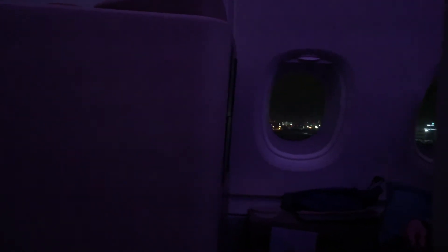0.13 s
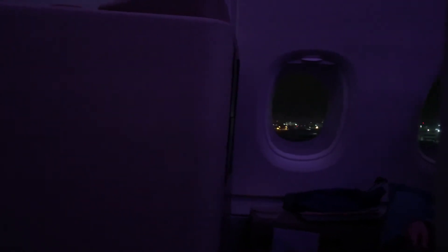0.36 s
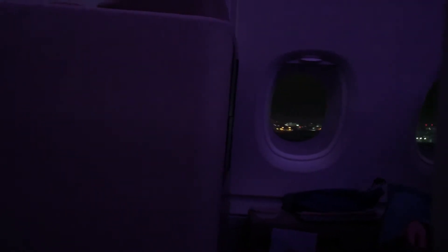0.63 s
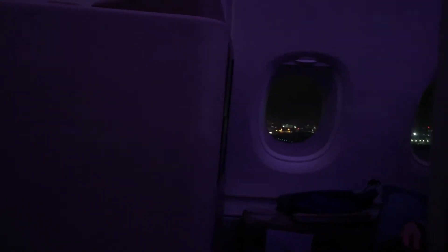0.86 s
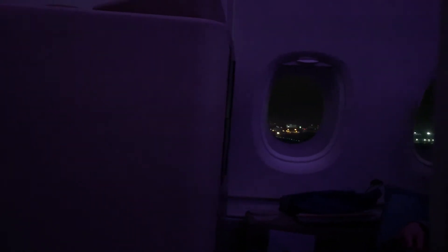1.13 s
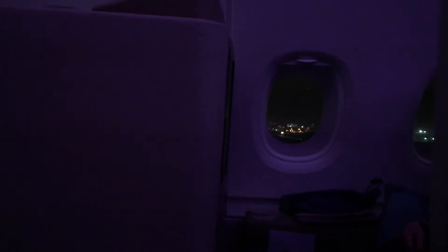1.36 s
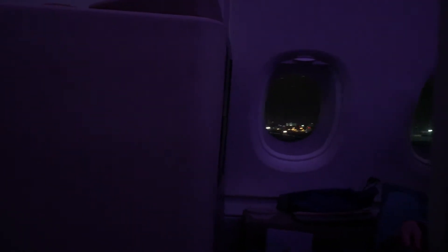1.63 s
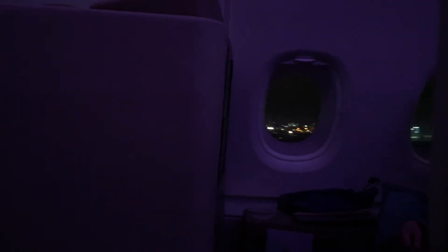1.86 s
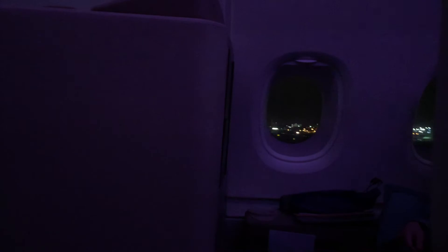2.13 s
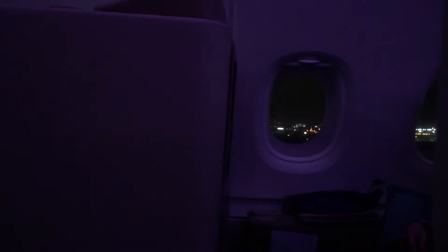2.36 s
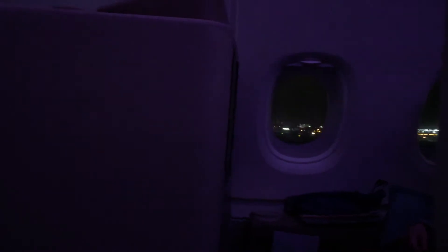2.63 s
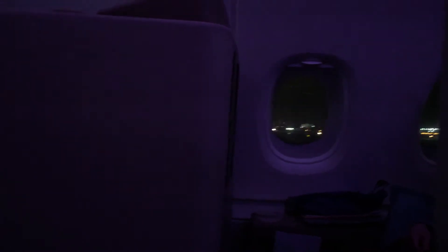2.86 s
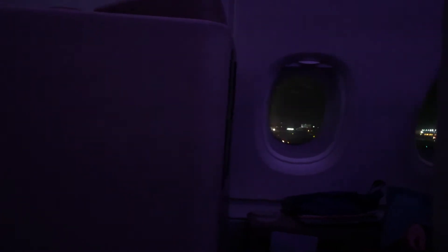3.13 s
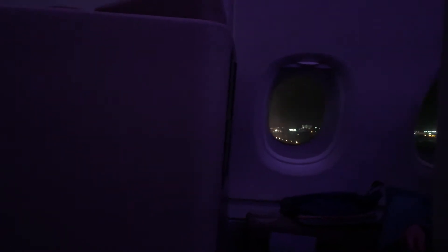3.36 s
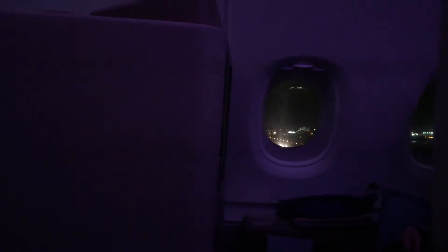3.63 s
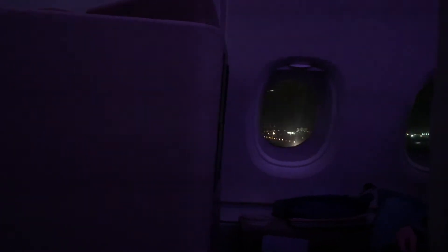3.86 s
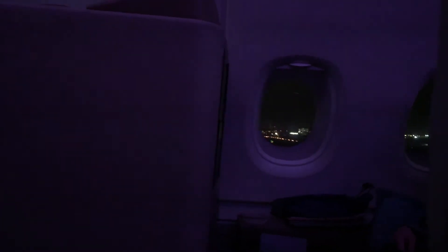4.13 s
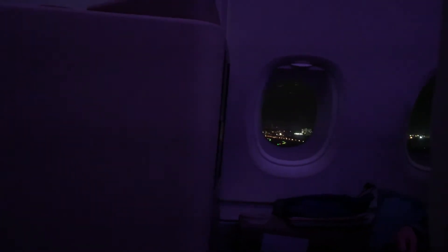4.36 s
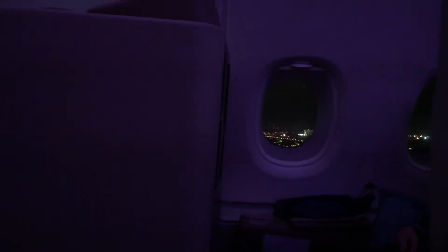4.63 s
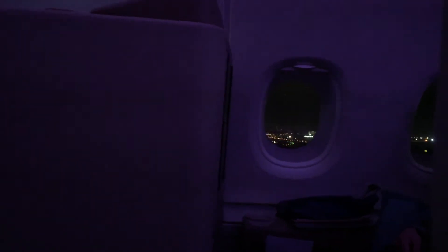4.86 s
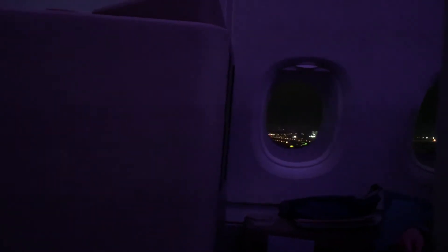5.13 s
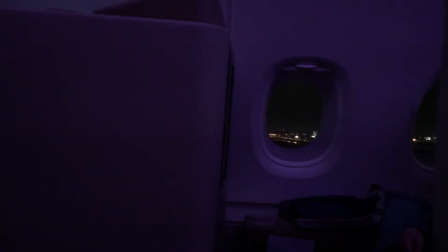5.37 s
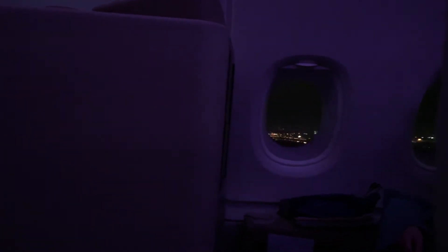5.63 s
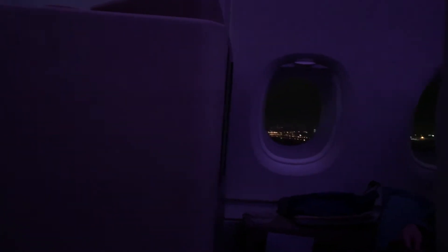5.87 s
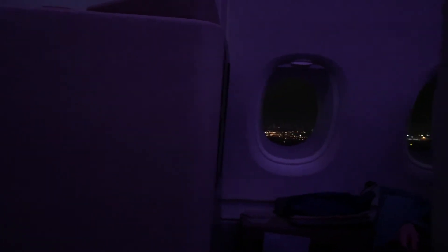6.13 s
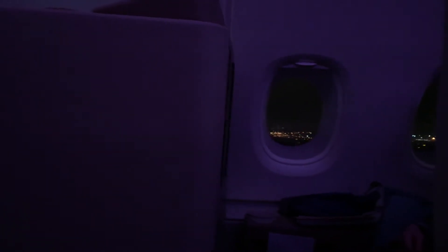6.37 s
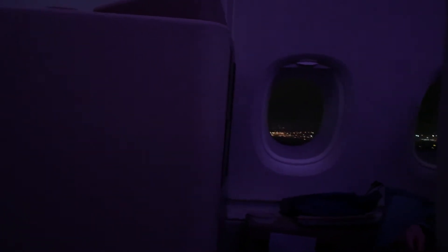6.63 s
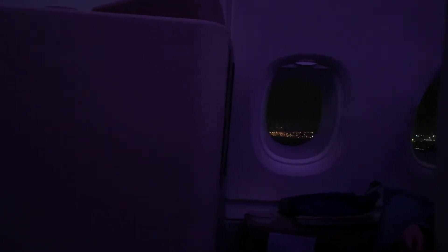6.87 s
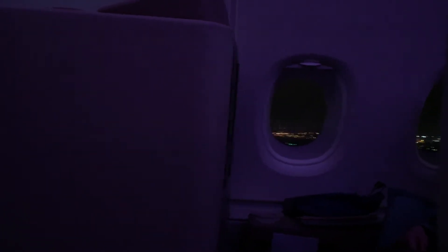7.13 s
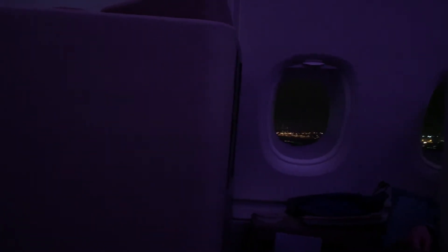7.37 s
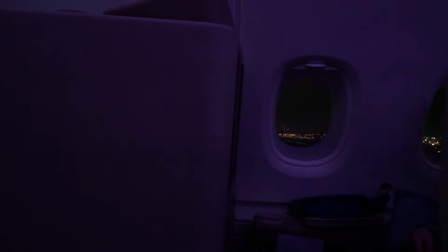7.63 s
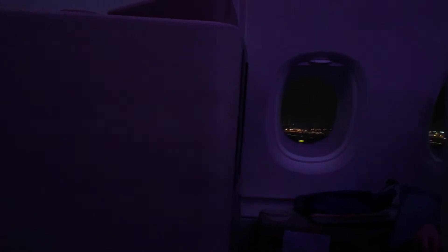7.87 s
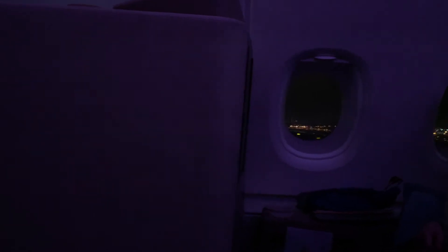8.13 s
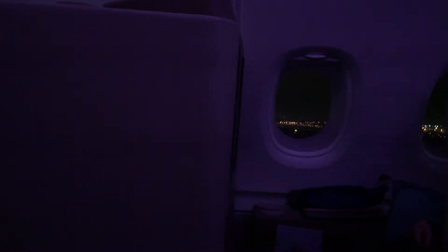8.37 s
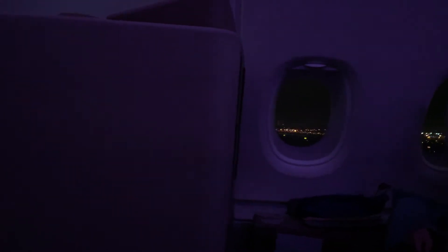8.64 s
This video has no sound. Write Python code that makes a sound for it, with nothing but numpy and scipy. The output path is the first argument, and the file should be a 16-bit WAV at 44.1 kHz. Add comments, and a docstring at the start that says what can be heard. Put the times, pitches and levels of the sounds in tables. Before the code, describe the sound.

Inside a passenger plane speeding along the runway, a heavy low roar and soft air hiss, with clattering panels and small sharp clicks.

```python
"""Engine and airframe roar inside an airliner cabin at takeoff: noise shaped by the hull into a deep rumble.
Air rush lies over it as a nearly steady hiss of shaped noise.
Jolts swell the clatter of loose panels, trim and small parts, made of noise bursts and short rings.
Panels knock, a latch ticks and one metal part pings as fading sine tones; plastic trim snaps as sharp cracks.
The cabin adds a short tail to these fittings, and the recorder's gain control evens out the rumble."""
import sys
import numpy as np
from scipy import signal
from scipy.fft import rfft, irfft, next_fast_len
from scipy.io import wavfile
from scipy.ndimage import uniform_filter1d, map_coordinates

SR = 44100
rng = np.random.default_rng(int(sys.argv[2]) if len(sys.argv) > 2 else 0)


def put_to_file(sound):
    """Save the sound as 16-bit audio at rate SR, in the file named by the first command-line argument."""
    columns = np.atleast_2d(sound).T  # one column per channel
    safe = np.clip(columns, -1, 1)
    whole_steps = np.round(safe * 32767)
    wavfile.write(sys.argv[1], SR, whole_steps.astype(np.int16))


def nominal_scale(level):
    """Amplitude ratio for a level in decibels (scalar or array-like)."""
    x = np.asarray(level, float) / 20
    return 10 ** x


N = 385875  # length in samples: 8.75 s

# All levels below are settings ahead of the recorder's gain control.
# Engine roar through the hull: (deep part [dB], body part [dB])
ROAR_LEVELS = (-25, -29.5)
# Hull colour of the deep roar: (frequency [Hz], level per Hz [dB])
DEEP_COLOUR = [(12, -46.5), (22, -22.5), (32, -11), (50, 1), (66, 1), (88, 1.5), (103, -8), (130, -16.5),
               (170, -35.5), (290, -120)]
# Hull colour of the body of the roar: (frequency [Hz], level per Hz [dB])
BODY_COLOUR = [(53, -26.5), (90, -6), (120, -8.5), (150, -6), (178, -8.5), (212, -10.5), (260, -19.5),
               (300, -18), (330, -23.5), (372, -23), (420, -28), (450, -38.5), (520, -40), (680, -55.5),
               (1140, -120)]
# Chance level drift of the deep rumble noise: (time [s], level change [dB])
RUMBLE_DRIFT = [(0, -1), (.35, -2), (.7, 0.5), (1.2, 1.5), (1.9, 0), (2.6, 2.5), (3.2, 0.5), (3.7, -1),
                (4.3, 3), (4.8, 0.5), (5.3, -1), (6, 0.5), (6.7, -2), (7.2, 1), (7.8, 1), (8.1, -3.5),
                (8.75, 0.5)]
# A side wall panel that hums along: (frequency [Hz], width at half amplitude [Hz], rms level [dB])
WALL_HUM = (278, 13, -45.5)
# The humming panel comes and goes: (time [s], level change [dB])
WALL_HUM_SWELL = [(0, 1.5), (1.1, -1.5), (1.6, 2), (2.9, 4), (3.3, -6), (4.3, 2), (5.3, 2), (5.8, -0.5),
                  (7, 0.5), (7.6, 1.5), (8.2, 2), (8.75, -5)]
# Air rush along the skin: (frequency [Hz], level per Hz [dB])
RUSH_COLOUR = [(260, -34), (450, 1.5), (734, 0.5), (1000, -5.5), (1130, -6), (1590, -7), (1870, -11.5),
               (2370, -14.5), (2670, -23.5), (4040, -26), (4820, -33), (5270, -33.5), (7640, -40),
               (8990, -43.5), (15600, -47.5)]
# Colour of the clatter of loose panels: (frequency [Hz], level per Hz [dB])
PANEL_COLOUR = [(260, -34), (450, 2), (684, -0.5), (819, 0.5), (927, -2.5), (1250, -1.5), (1360, -5.5),
                (1570, -4), (1940, -8.5), (3200, -15.5), (4160, -50), (7040, -120)]
# Colour of the clatter of loose trim: (frequency [Hz], level per Hz [dB])
TRIM_COLOUR = [(1350, -19.5), (2300, 0.5), (2470, -3), (3170, -5.5), (3600, -6.5), (4260, -9),
               (4840, -16.5), (5200, -14), (6800, -18), (8840, -49), (15000, -120)]
# Colour of the fizz of small parts: (frequency [Hz], level per Hz [dB])
FIZZ_COLOUR = [(3530, -29.5), (6000, -5.5), (6740, -7), (7180, -11), (8660, -2), (10200, -7.5), (12400, -7),
               (15600, -13)]
# Jolts of the airframe; small parts get the hardness on top:
# (time of peak [s], peak over the steady tremor [dB], length [s], hardness [dB])
AIRFRAME_JOLTS = [(0.01, 18, 0.018, 0.5), (0.122, 4.5, 0.07, 3), (0.437, 5, 0.1, 0.5), (0.637, 6, 0.07, 4),
                  (.82, 5, 0.058, -9), (0.886, 9.5, 0.12, 1.5), (1.142, 5, .06, 3.5),
                  (1.562, 6.5, 0.35, -2.5), (2.16, 5, .25, 1), (2.362, 12.5, 0.036, -7),
                  (2.663, 8, 0.087, 2), (3.068, 3, 0.12, 1.5), (3.601, 3, 0.038, 3.5),
                  (3.897, 6.5, 0.025, 5.5), (3.975, 5.5, 0.03, 7.5), (4.041, 0.5, 0.027, 9),
                  (4.3, 0.5, 0.086, 5), (4.832, 7, 0.094, -1), (4.926, 7, 0.088, 1), (5.07, 5, 0.054, -8.5),
                  (5.17, 5, 0.2, 2.5), (5.456, 13, 0.048, 3), (5.545, 11, 0.086, -3),
                  (5.644, 4.5, 0.048, -1), (5.803, 9, 0.062, -2.5), (5.894, 14, 0.069, 5),
                  (6.383, 5.5, 0.35, 0), (6.757, 8, 0.058, 1), (7.13, 12.5, 0.057, 2.5), (7.21, 4, .06, 7),
                  (7.44, 8, 0.16, -1), (7.87, 5.5, 0.15, 1), (8.518, 6, 0.11, 3.5), (8.722, 11, 0.12, -0.5)]
# Clatter settings under the steady tremor alone: (panels [dB], trim [dB], small parts [dB])
TREMOR_LEVELS = (-55, -68, -81.5)
# Clatter gained per dB of jolt: (panels [dB/dB], trim [dB/dB], small parts [dB/dB])
JOLT_GROWTH = (0.92, 1.227, 0.94)
# Single knocks of a panel; struck nearer the edge it rings brighter:
# (time [s], peak level [dB], tilt [dB per octave])
PANEL_KNOCKS = [(0.018, -33, -5), (0.122, -32.5, 1), (0.67, -38, 2), (0.818, -34.5, -6.5), (0.907, -37, 8),
                (0.963, -37, -5), (1.114, -36.5, 1), (1.173, -37, 4), (2.141, -34, 0), (2.237, -33.5, -3),
                (2.68, -36, 0), (2.934, -33.5, -3), (3.919, -36.5, 5), (4.01, -38.5, 4), (4.338, -45, 3),
                (4.8, -33.5, 6), (4.94, -39, 8), (4.956, -31.5, -7), (5.15, -36.5, -6), (5.17, -39, 6),
                (5.379, -37, 4), (5.428, -34.5, 1), (5.45, -33, -9), (5.475, -38, 6), (5.78, -37, 0),
                (5.867, -30, -3), (5.878, -35, -3), (5.903, -28, -9), (5.94, -38, -2), (6.18, -37.5, -1),
                (6.339, -40, 3), (6.357, -35.5, 3), (7.049, -33, -5), (7.1, -43, 1), (7.132, -31, 2),
                (7.147, -35, 0), (7.36, -35.5, -3), (7.409, -35, 5), (7.425, -35, -6.5), (7.447, -33, -1),
                (7.498, -35.5, 8), (7.693, -37, 0), (7.768, -35.5, -1), (7.878, -36, -1), (8.111, -37, -4),
                (8.52, -37, -3), (8.602, -37, -8), (8.62, -35, -4), (8.707, -32.5, -9)]
# Ways a panel rings: (frequency [Hz], level [dB], time to fade 60 dB [s])
PANEL_MODES = [(650, -4, .035), (765, -3, .035), (910, -2, .035), (1110, 0, .04), (1250, 0, .04),
               (1450, 2, .038), (1570, 0, .038), (1780, -9, .03), (2300, -13, .025)]
# Clear ticks of a loose latch: (time [s], peak level [dB])
LATCH_TICKS = [(0.4503, -43), (0.4877, -45.5), (0.879, -42), (2.3589, -49.5), (2.7376, -48.5),
               (3.5896, -45), (3.8845, -49), (4.7545, -45.5), (4.887, -48), (4.9585, -47), (5.0024, -47),
               (5.0423, -49), (5.1326, -45.5), (5.215, -52), (5.2668, -46), (5.4684, -39.5), (5.5118, -45),
               (5.5517, -44.5), (5.5941, -45), (5.864, -37), (5.9024, -40), (6.7474, -40.5), (6.913, -50),
               (7.0877, -42.5), (7.131, -46), (7.224, -47), (7.445, -44), (7.8684, -50), (7.882, -43),
               (7.972, -52), (8.1562, -46), (8.245, -47), (8.3368, -49), (8.398, -49)]
# Ways the latch rings: (frequency [Hz], level [dB], time to fade 60 dB [s])
LATCH_MODES = [(3150, -8, .02), (3350, -5, .025), (3580, 0, .032), (3850, -1, .03), (4170, -3, .026),
               (4400, -10, .018)]
# One small metal ping: (time [s], peak level [dB])
METAL_PING = [(.303, -67)]
# The way the metal part rings: (frequency [Hz], level [dB], time to fade 60 dB [s])
METAL_MODE = [(8430, 0, 0.13)]
# Snaps of plastic trim: (time [s], strength [dB])
TRIM_SNAPS = [(0.015, -43), (0.2033, -48), (0.3855, -49), (0.4193, -49.5), (0.6165, -46), (0.849, -44.5),
              (0.879, -31.5), (1.5758, -51), (2.5401, -52), (2.6653, -47), (3.017, -46.5), (4.04, -56),
              (4.2862, -54.5), (4.3271, -51), (4.8638, -49), (5.234, -51), (5.4687, -43), (5.5303, -48),
              (5.7877, -44.5), (5.8296, -45.5), (5.866, -43), (6.099, -50), (6.4014, -48), (6.492, -47.5),
              (6.6775, -50), (6.748, -46.5), (7.0873, -49), (7.353, -45), (8.488, -53), (8.53, -51),
              (8.6492, -48), (8.7316, -49)]
# Colour of a snap: (frequency [Hz], level per Hz [dB])
SNAP_COLOUR = [(700, -33), (1500, -7), (3500, 2), (5500, 0), (8500, -1), (10500, -5), (12500, -8),
               (15600, -8.5), (15800, -85.5)]
# A crack comes back inverted off the panel behind the trim: (delay [s], share of amplitude [ratio])
SNAP_BACKING = (.00062, .6)
# Cabin tail: (frequency [Hz], time to fade 60 dB [s])
CABIN_TAIL = [(500, .2), (3000, 0.14), (12000, 0.12)]


def unit(x):
    """Scale to an rms (average strength) of 1."""
    return x / np.sqrt(np.mean(x ** 2) + 1e-20)


def along(points, hz):
    """Read a table of (frequency, value) points on a log frequency axis."""
    f, value = np.transpose(points)
    return np.interp(np.log(hz + 1), np.log(f + 1), value)


def curve(points):
    """Join (time, value) points by straight lines, one value per sample."""
    s, value = np.transpose(points)
    return np.interp(np.arange(N) / SR, s, value)


def wobble(rate):
    """A smooth random curve with rate knots a second."""
    knots = rng.standard_normal(int(N * rate / SR) + 4)
    return map_coordinates(knots, [np.arange(N) * rate / SR])


def filtered(x, response):
    """Multiply the spectrum of x by a response that depends on frequency."""
    m = next_fast_len(N + SR // 2)
    return irfft(rfft(x, m) * response(np.fft.rfftfreq(m, 1 / SR)), m)[:N]


def coloured(x, spectrum):
    """Give x the colour of a table, at rms 1."""
    return unit(filtered(x, lambda hz: nominal_scale(along(spectrum, hz))))


def cabin(x):
    """Echoes off the cabin die at a speed set by frequency; each 1/8 s of sound gets a new random tail."""
    out, step = np.zeros(N + SR), SR // 8
    for start in range(0, N, step):
        hz, t, z = signal.stft(rng.standard_normal(SR // 3), SR, nperseg=256)
        fade = nominal_scale(-60 * t / along(CABIN_TAIL, hz)[:, None])
        tail = signal.istft(z * fade, SR, nperseg=256)[1]
        answer = signal.fftconvolve(x[start:start + step], tail / np.linalg.norm(tail))
        out[start + 200:][:len(answer)] += answer  # starts 200 samples late
    return out[:N]


def rush():
    """Air tumbling in the thin layer along the skin makes shaped noise, nearly steady."""
    level_db = -52 + 0.25 * wobble(6.1)
    return nominal_scale(level_db) * coloured(rng.standard_normal(N), RUSH_COLOUR)


def shudder():
    """Jolts add power to the steady tremor; gives dB over the tremor for heavy and for small parts."""
    rise, fall = 0.76, 0.53  # build-up and decay, as shares of a jolt's length
    s, db, length, hard_db = np.transpose(AIRFRAME_JOLTS)[:, :, None]
    coarse = np.arange(0, N + 64, 64)
    since = (coarse / SR - s) / length
    shape = np.exp(-np.where(since < 0, -since / rise, since / fall) ** 1.5)

    def level(peak_db):
        power = 1 + np.sum((nominal_scale(2 * peak_db) - 1) * shape, axis=0)
        return np.interp(np.arange(N), coarse, 10 * np.log10(power))

    return level(db), level(db + hard_db)


def bursts(sizes, t60, attack):
    """Noise that jumps up at each contact and dies away."""
    t = np.arange(SR // 8) / SR
    fade = nominal_scale(-60 * t / t60) * (1 - np.exp(-t / attack))
    return signal.fftconvolve(sizes, fade)[:N] * rng.standard_normal(N)


def clatter(spectrum, rate, spread_db, t60):
    """Many noisy contacts of uneven size, about rate of them a second."""
    contact = rng.random(N) < rate / SR
    sizes = contact * nominal_scale(spread_db * rng.standard_normal(N))
    return coloured(bursts(sizes, t60, attack=0.0021), spectrum)


def grains(spectrum, rate, low_hz, high_hz, cycles, spread_db):
    """Random small contacts, each ringing its own pitch for a few cycles after a soft start."""
    when, pitch, size = rng.random((round(rate * N / SR), 3)).T
    hz = (low_hz * (high_hz / low_hz) ** pitch)[:, None]
    k = np.arange(500)
    turns = hz * k / SR
    ring = np.sin(2 * np.pi * turns) * np.exp(-turns / cycles) * (1 - np.exp(-turns)) * hz
    ring = ring * nominal_scale(along(spectrum, hz) + spread_db * size[:, None] ** 2)  # few are large
    where = (when * N).astype(int)[:, None] + k
    return unit(np.bincount(where.ravel(), ring.ravel(), N + len(k))[:N])


def loose_panels():
    """Loose panels bang on their mounts: low noisy contacts and short rings."""
    noisy = clatter(PANEL_COLOUR, rate=330, spread_db=3.5, t60=0.055)
    ringing = grains(PANEL_COLOUR, 300, low_hz=585.0, high_hz=2595, cycles=4.5, spread_db=14)
    return nominal_scale(-2.5) * noisy + nominal_scale(-8.0) * ringing


def loose_trim():
    """Loose trim is lighter, so its contacts and rings are higher."""
    noisy = clatter(TRIM_COLOUR, rate=260, spread_db=4.5, t60=0.064)
    ringing = grains(TRIM_COLOUR, 350, low_hz=2397, high_hz=6310, cycles=20, spread_db=16)
    return nominal_scale(-2.0) * noisy + nominal_scale(-9.5) * ringing


def small_parts():
    """Small parts fizz with the highest contacts and rings."""
    noisy = clatter(FIZZ_COLOUR, rate=190, spread_db=4.0, t60=0.088)
    ringing = grains(FIZZ_COLOUR, 400, low_hz=6230, high_hz=14800, cycles=10, spread_db=17.0)
    return nominal_scale(-2.0) * noisy + nominal_scale(-7.5) * ringing


def struck(hits, modes, spread_db, attack, rough, detune=.025):
    """Each hit rings all modes with new strengths and pitch; loose contact makes the ring buzz."""
    # detune: a loose part never sits the same way twice, so its pitch spreads by this share
    out, t = np.zeros(N + SR), np.arange(SR // 5) / SR
    chance = rng.standard_normal((len(hits), len(modes)))
    for (s, db, *tilt_db), row in zip(hits, chance):
        ring = np.zeros(len(t))
        for (hz, level, t60), r in zip(modes, row):
            mode_db = level + sum(tilt_db) * np.log2(hz) + spread_db * r
            pitch = hz * (1 + detune * row[-1])
            ring += nominal_scale(mode_db - 60 * t / t60) * np.sin(2 * np.pi * pitch * t)
        ring = ring * (1 - np.exp(-t / attack))
        out[round(s * SR):][:len(t)] += nominal_scale(db) * ring / np.abs(ring).max()
    return out[:N] * (1 + rough * wobble(900)) / np.hypot(1, rough)


def chatter(shake_db):
    """The latch swings steadily and now and then touches, harder in a jolt; gives a list of hits."""
    swings, share, tremor_db = 23, .3, -55  # a second; share that touch; peak under the tremor alone
    s = np.arange(1, int(N / SR * swings)) / swings
    touch, early = rng.random((len(s), 2)).T
    s = (s - .2 * early / swings)[touch < share]
    return list(zip(s, tremor_db + 0.2 * shake_db[(s * SR).astype(int)]))


def snaps():
    """Each snap is a sharp crack with a short broad tail; harder snaps crack more."""
    s, db = np.transpose(TRIM_SNAPS)
    at = np.round(s * SR).astype(int)
    crack = np.bincount(at, nominal_scale(1.28 * db + 20.5), N)
    delay_s, share = SNAP_BACKING
    crack = filtered(crack, lambda hz: 1 - share * np.exp(-2j * np.pi * hz * delay_s))
    tail = bursts(np.bincount(at, nominal_scale(db - 6.0), N), 0.041, attack=0.00068)
    return filtered(crack + tail, lambda hz: nominal_scale(along(SNAP_COLOUR, hz)))


def fittings():
    """All that is loose in the cabin; clatter and latch chatter get louder while the airframe shudders."""
    heavy_db, small_db = shudder()
    shakes = (heavy_db, small_db, small_db)
    panel_db, trim_db, fizz_db = (db + k * shake for db, k, shake in zip(TREMOR_LEVELS, JOLT_GROWTH, shakes))
    loose = nominal_scale(panel_db) * loose_panels() + nominal_scale(trim_db) * loose_trim() + nominal_scale(fizz_db) * small_parts()
    knocks = struck(PANEL_KNOCKS, PANEL_MODES, spread_db=3.5, attack=0.0009, rough=0.28)
    latch_hits = LATCH_TICKS + chatter(small_db)
    ticks = struck(latch_hits, LATCH_MODES, spread_db=2.0, attack=0.00041, rough=0.12)
    ping = struck(METAL_PING, METAL_MODE, spread_db=0, attack=.003, rough=0, detune=0)
    return loose + knocks + ticks + ping + snaps()


def wall_hum():
    """One wall panel picks its own pitch out of the noise that drives it."""
    hz0, width, level_db = WALL_HUM
    drive = rng.standard_normal(N)
    hum = unit(filtered(drive, lambda hz: 1 / (1 + ((hz - hz0) / width * 2) ** 2)))
    return nominal_scale(level_db + curve(WALL_HUM_SWELL) + 2.5 * wobble(5)) * hum


def roar():
    """Jet turbulence is noise filtered by the hull; the deep part is noise whose level drifts."""
    deep_db, body_db = ROAR_LEVELS
    deep = coloured(rng.standard_normal(N), DEEP_COLOUR)
    deep = nominal_scale(deep_db + curve(RUMBLE_DRIFT) + 1.3 * wobble(11)) * deep
    body = nominal_scale(body_db) * coloured(rng.standard_normal(N), BODY_COLOUR)
    return deep + nominal_scale(0.71 * wobble(2.8)) * (body + wall_hum())


def scene():
    """Roar and rush fill the cabin; the fittings are near and echo."""
    near = fittings()
    echo = nominal_scale(-9.5) * cabin(near)
    return (rush() + near + echo + roar())[None]


def roll_off(x):
    """The treble ends steeply here."""
    return signal.sosfilt(signal.butter(12, 15710, fs=SR, output="sos"), x)


def record(dry):
    """Fast gain control follows the level over 26 ms, turning swells down and lulls up."""
    level = np.sqrt(np.abs(uniform_filter1d(dry ** 2, round(0.026 * SR))) + 1e-9)
    gain = (level / nominal_scale(-23.0)) ** -.2  # no change at -23 dB
    return roll_off(dry * gain)


dry = scene()
out = record(dry)
put_to_file(out)
```